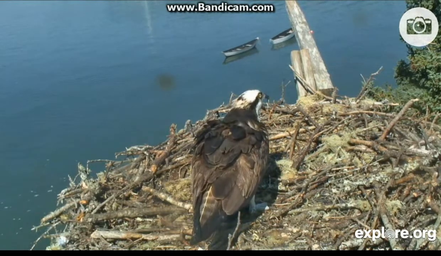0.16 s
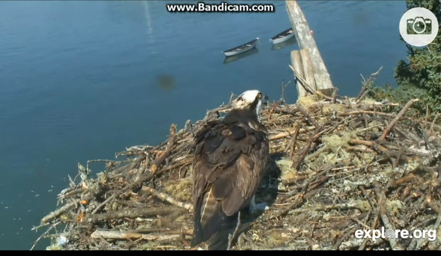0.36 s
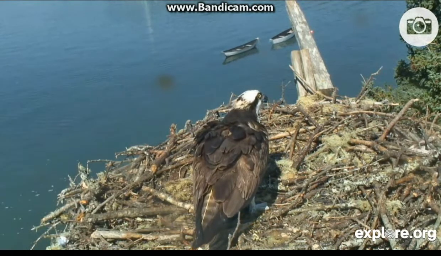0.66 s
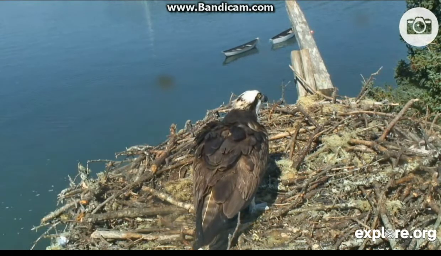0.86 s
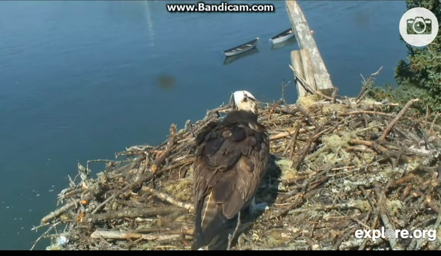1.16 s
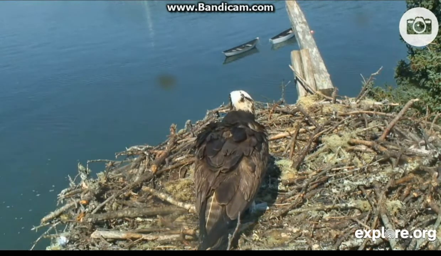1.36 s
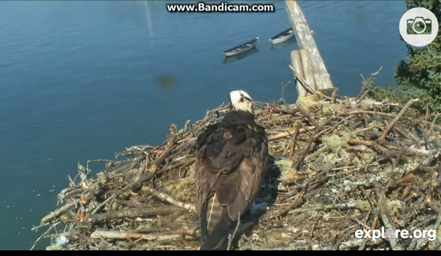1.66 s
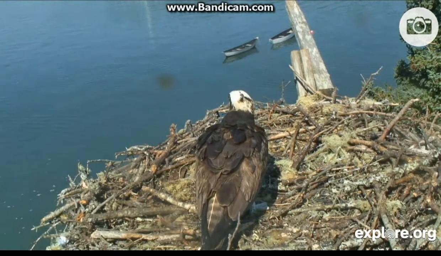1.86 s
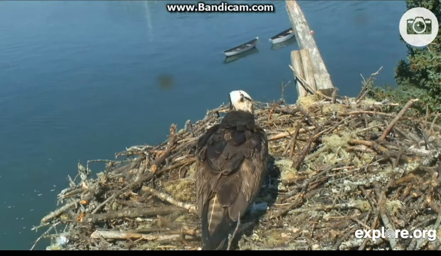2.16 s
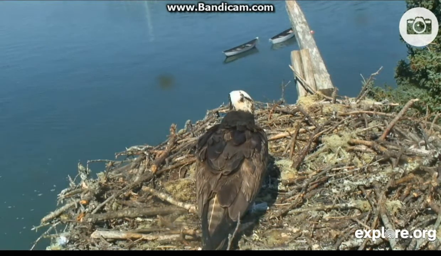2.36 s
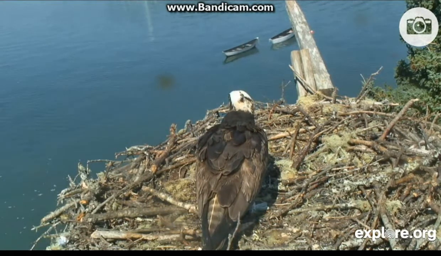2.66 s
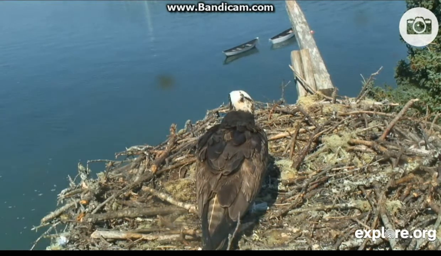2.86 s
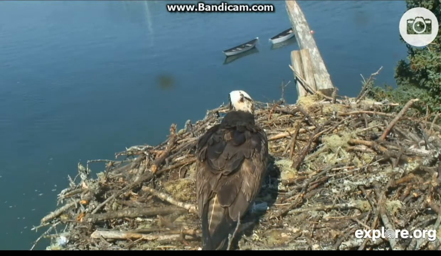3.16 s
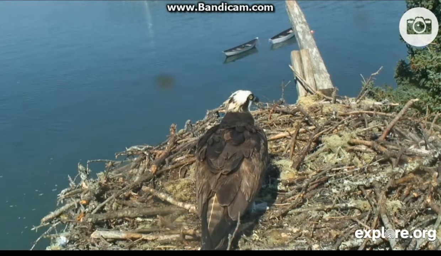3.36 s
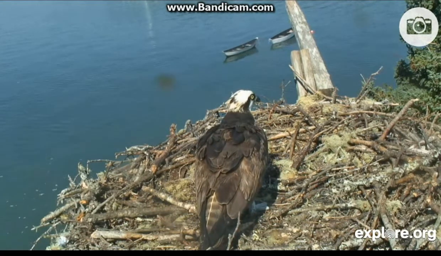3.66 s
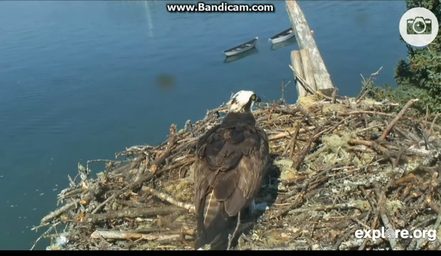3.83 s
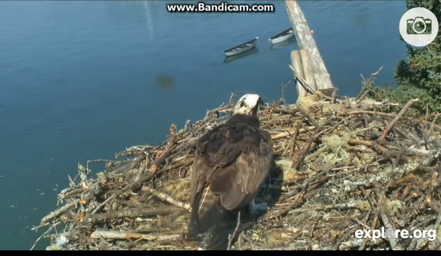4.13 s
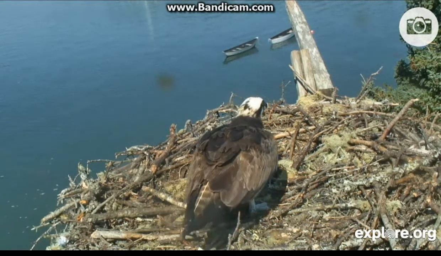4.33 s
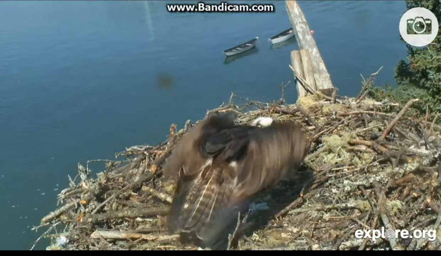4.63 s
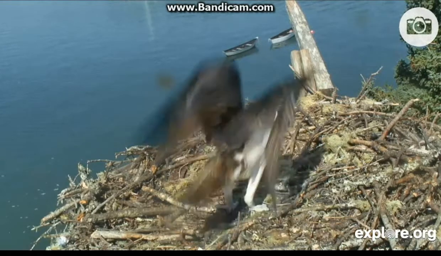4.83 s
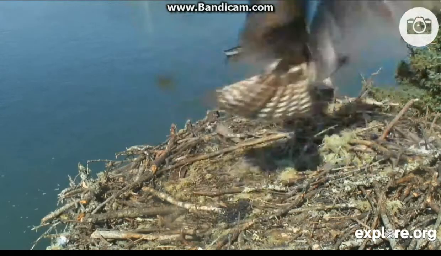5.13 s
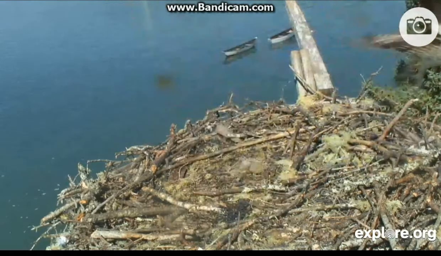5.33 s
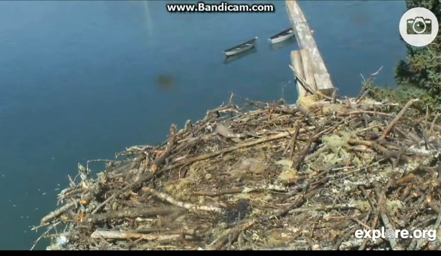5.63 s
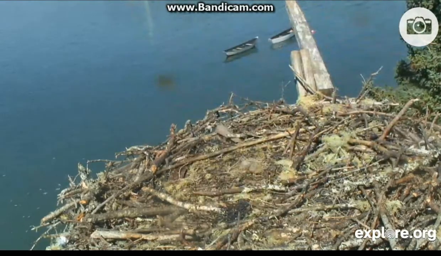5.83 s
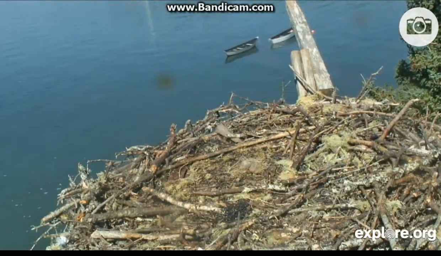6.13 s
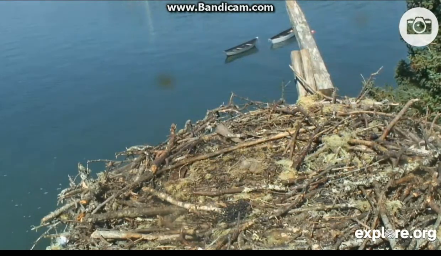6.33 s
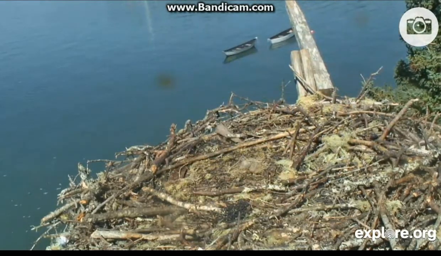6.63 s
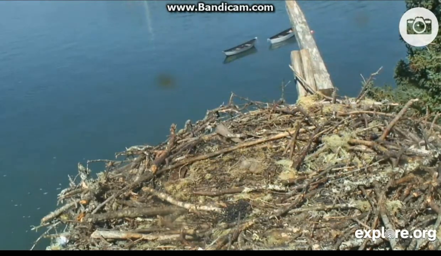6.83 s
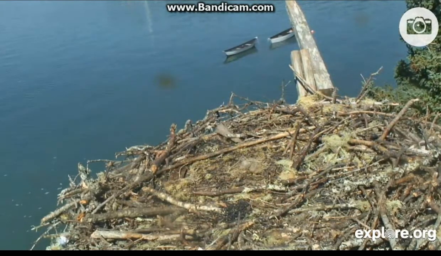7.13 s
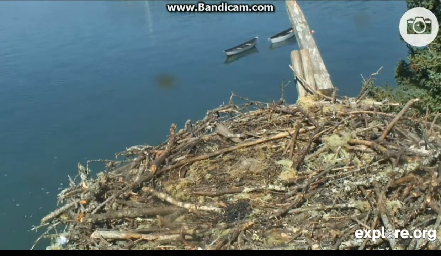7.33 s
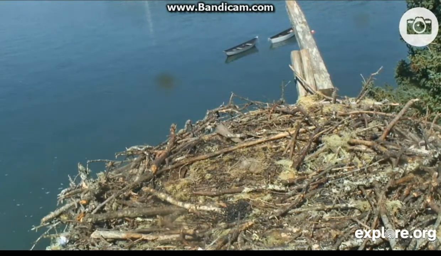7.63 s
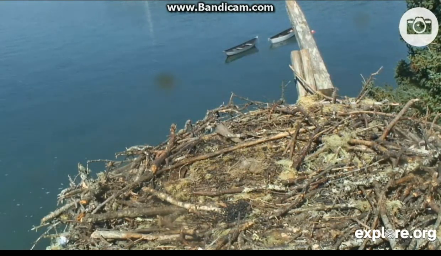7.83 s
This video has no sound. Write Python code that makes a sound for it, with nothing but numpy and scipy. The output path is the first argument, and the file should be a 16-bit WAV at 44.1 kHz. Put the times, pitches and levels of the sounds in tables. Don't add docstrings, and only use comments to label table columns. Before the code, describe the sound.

Brief piping bird chirps, a burst of wingbeats and crackling sticks, one loud snap, then only low hum, faint lapping water and wind.

```python
import sys
import numpy as np
from scipy import signal
from scipy.fft import rfft, irfft, next_fast_len
from scipy.io import wavfile
from scipy.ndimage import uniform_filter1d, map_coordinates

SR = 44100
rng = np.random.default_rng(int(sys.argv[2]) if len(sys.argv) > 2 else 0)


def gain_from_db(level_db):
    decades = np.asarray(level_db, float) / 20
    return 10 ** decades


def wav_out(sig):
    wavfile.write(sys.argv[1], SR, np.round(np.clip(np.atleast_2d(sig).T, -1, 1) * 32767).astype(np.int16))


N = 352359
T = np.arange(N) / SR


def unit(x):
    return x / np.sqrt(np.mean(x ** 2) + 1e-20)


def wobble(rate_hz):
    knots = rng.standard_normal(int(N * rate_hz / SR) + 4)
    return map_coordinates(knots, [T * rate_hz])


def filtered(x, response):
    m = next_fast_len(N + 8192)
    return irfft(rfft(x, m) * response(np.fft.rfftfreq(m, 1 / SR)), m)[:N]


def swells(start_s, peak_db, rise_db_s, fall_db_s, rest_db=-120, hold_s=0):
    coarse = T[::64]
    late = coarse - np.asarray(start_s)[:, None]
    fall = -fall_db_s * np.maximum(late - hold_s, 0)
    db = np.asarray(peak_db)[:, None] + np.minimum(rise_db_s * late, fall)
    power = np.sum(gain_from_db(db) ** 2, axis=0) + gain_from_db(rest_db) ** 2
    return np.interp(T, coarse, 10 * np.log10(power))


def rush(spectrum, patchy_db, lifts=()):
    f, db = np.transpose(spectrum)
    z = signal.stft(rng.standard_normal(N), nperseg=256)[2]
    field = uniform_filter1d(rng.standard_normal(z.shape), size=4, axis=0)
    field = uniform_filter1d(field, size=5, axis=1)
    noise = signal.istft(z * gain_from_db(patchy_db * unit(field)), nperseg=256)[1][:N]

    def response(hz):
        lift_db = sum(gain / (1 + (2 * (hz - centre) / width) ** 2) for centre, width, gain in lifts)
        return gain_from_db(np.interp(np.log(hz + 1), np.log(f), db, right=-120) + lift_db)

    return unit(filtered(noise, response))


def bubbles(start_s, level_db, pitch_hz, cycles, rise):
    k = np.arange(SR // 25)
    turns = pitch_hz[:, None] * k / SR
    life = turns / cycles[:, None]
    envelope = gain_from_db(level_db[:, None] - 25.0 * life) * (1 - np.exp(-turns / 0.88))
    rows = envelope * np.sin(2 * np.pi * turns * (1 + rise * life))
    at = np.round(start_s * SR).astype(int)[:, None] + k
    return np.bincount(at.ravel(), rows.ravel(), N + SR)[:N]


FAN_PITCHES = (107.447, 103.13, 142.8)
HUM_ORDERS = [
    [1, 2, 4, 6, 9, 18, 36],
    [1, 2, 10, 30],
    [1, 2, 4],
    [1, 3, 4, 5, 6, 9],
]
HUM_LEVELS = [
    [-45, -80, -73, -86.5, -90.5, -99, -91.5],
    [-60, -76.5, -78, -86.5],
    [-79.5, -94, -82],
    [-85.5, -81, -81.5, -87, -84.5, -83],
]
# start_s, level_db
FAN_LOAD = [(0.0, -48), (0.22, -48.5), (2.71, -48.5), (3.25, -49.5), (4.27, -48.5), (4.63, -49.5),
            (5.39, -48), (5.83, -49), (6.45, -48), (6.81, -49), (7.65, -48), (7.99, -49)]


def hum():
    mains_hz, in_step_s = 60.01, .025
    out = np.zeros(N)
    drifts = (0.05, .12, 0.076, 0.025)
    for hz, orders, levels, drift in zip(FAN_PITCHES + (mains_hz,), HUM_ORDERS, HUM_LEVELS, drifts):
        angle = 2 * np.pi * hz * (T - in_step_s) + drift * wobble(1.5)
        for k, db in zip(orders, levels):
            level = np.sqrt(2) * gain_from_db(db + 5 * drift * wobble(6))
            out += level * np.cos(k * angle + (k - 1) ** 2)
    load_s, load_db = np.transpose(FAN_LOAD)
    load_db = np.interp(T, load_s, load_db)
    return out * gain_from_db(load_db - load_db.mean())


# pitch_hz, density_db (per Hz)
HISS_SPECTRUM = [(74, -31), (125, -15), (140, -39.5), (210, -19), (388, -32.5), (428, -27), (462, -31),
                 (549, -31.5), (791, -42), (996, -32.5), (1410, -41.5), (2410, -70.5), (3100, -42.5),
                 (4820, -47), (12400, -50.5), (16100, -81.5), (22000, -120)]
# pitch_hz, width_hz, lift_db
HOUSING_MODES = [(540, 117, 9), (1050, 260, 1), (3035, 124, 10), (3710, 330, 9.5)]
# pitch_hz, density_db (per Hz)
BUFFET_SPECTRUM = [(10, -10), (22, -11), (45, -12), (80, -7.5), (140, -8.5), (200, -24), (300, -94)]
# pitch_hz, density_db (per Hz)
THUD_SPECTRUM = [(10, -6), (25, -0.5), (45, -4), (70, -25), (100, -88)]
# start_s, peak_db
WIND_GUSTS = [(1.65, -76), (2.85, -71), (3.14, -69), (5.54, -73), (6.43, -76), (7.05, -75), (7.63, -71),
              (7.82, -67), (7.9, -69), (7.98, -70)]


def air():
    hiss = gain_from_db(-68 + 0.28 * wobble(3.9)) * rush(HISS_SPECTRUM, 0.45, HOUSING_MODES)
    calm_db = -74.5
    wind_db = swells(*np.transpose(WIND_GUSTS), rise_db_s=79, fall_db_s=72, rest_db=calm_db)
    thud = gain_from_db(-90.5 + 3.1 * (wind_db - calm_db)) * rush(THUD_SPECTRUM, 1.5)
    buffet = gain_from_db(wind_db + 3.0 + 1.1 * wobble(9)) * rush(BUFFET_SPECTRUM, 0.39)
    return hiss + thud + buffet


# start_s, peak_db
SHORE_WAVES = [(.92, -79.5), (1.4, -79), (1.75, -76), (2.92, -71.5), (4.5, -74.5), (6.1, -76.5),
               (7.55, -79.5)]
# pitch_hz, density_db (per Hz)
WASH_SPECTRUM = [(150, -50), (400, 3), (700, -6), (1500, -7), (2500, -12), (4000, -16.5), (8000, -56)]
# start_s, peak_db, pitch_hz
LARGE_BUBBLES = [(.562, -62.5, 2030), (.908, -51, 545), (.92, -47.5, 255), (.934, -53, 1220),
                 (.934, -66, 8800), (.934, -63, 2860), (.942, -59, 1920), (0.955, -63, 1680),
                 (1.194, -58, 1330), (1.2, -51.5, 597), (1.212, -59, 1170), (1.335, -62, 1920),
                 (1.393, -50.5, 1050), (1.398, -60, 1840), (1.41, -56, 1250), (1.486, -59, 1100),
                 (1.665, -56, 2120), (1.757, -59, 540), (4.174, -59, 1310), (4.421, -48, 590),
                 (4.51, -58, 1160), (4.545, -58, 1400), (4.577, -55, 487), (4.743, -58, 1090),
                 (4.76, -57.5, 2480), (5.988, -61, 1730), (6.016, -60, 1090), (6.23, -61, 1250),
                 (6.283, -59, 1910), (7.698, -55, 625)]


def water(count=1500):
    surge_db = swells(*np.transpose(SHORE_WAVES), rise_db_s=26, fall_db_s=61, rest_db=-81, hold_s=0.21)
    when, pitch, life, size = rng.random((count, 4)).T
    when = when * T[-1]
    hz = 450 * 6.5 ** pitch
    clumps_db = surge_db + 1.5 * wobble(9.4)
    db = clumps_db[(when * SR).astype(int)] + 5.5 - 1.6 * np.log(size + 0.028) - 3 * np.log2(hz / 1000)
    fizz = bubbles(when, db, hz, 5 + 6 * life, rise=.12)

    s, db, hz = np.transpose(LARGE_BUBBLES)
    cycles = 7.7 * (hz / 1000) ** 0.69
    plops = bubbles(s, db + 3.5, hz, cycles, rise=0.15)
    return fizz + plops + gain_from_db(surge_db + 6.0) * rush(WASH_SPECTRUM, 2.8)


# delay_s, level_db
BANK_ECHOES = [(.027, -23), (.038, -18), (.047, -19), (0.06, -21), (.087, -25), (.113, -24.5), (.13, -31),
               (0.191, -25.5)]


def shore(x):
    t = T[:SR // 2]
    answer = gain_from_db(-52.5 - 60 * t / 0.52) * (t > .012) * rng.standard_normal(len(t))
    for delay, db in BANK_ECHOES:
        answer[round(delay * SR)] += gain_from_db(db)
    echo = signal.fftconvolve(x, answer)[:N]
    flutter = gain_from_db(2.5 * wobble(260))
    return filtered(echo * flutter, lambda hz: 1 / (1 + (hz / 4500) ** 4))


# start_s, peak_db
TWIG_CRACKS = [
    (3.272, -34),
    (3.3094, -55),
]
# pitch_hz, level_db, t60_s
STICK_MODES = [(545, 5.5, 0.023), (705, 10.5, 0.011), (3160, 9.5, 0.0048), (5360, 5.5, 0.0046),
               (7300, -5, 0.0053), (8800, 3.5, 0.0058), (10500, -3.5, .005)]


def twig():
    out, t = np.zeros(N), T[:SR // 20]
    for s, db in TWIG_CRACKS:
        crack = 0.95 * gain_from_db(-60 * t / 0.014) * rng.standard_normal(len(t))
        for hz, level, t60 in STICK_MODES:
            onset = 1 - np.exp(-hz * t / 0.54)
            crack += gain_from_db(level - 60 * t / t60) * onset * np.sin(2 * np.pi * hz * t)
        out[round(s * SR):][:len(t)] += gain_from_db(db - 10) * crack
    return out


# start_s, hiss_db (feathers), push_db (moved air)
WING_STROKES = [(2.76, -76.5, -74), (2.88, -71.5, -70), (2.93, -74.5, -58), (3.02, -73, -72),
                (3.11, -70.5, -51.5), (3.19, -75.5, -60), (3.3, -76.5, -59), (3.395, -73.5, -59.5),
                (3.57, -79, -62), (3.665, -76, -61.5), (3.82, -83, -66), (3.94, -82, -71),
                (4.1, -82.5, -67)]
# pitch_hz, density_db (per Hz)
FEATHER_SPECTRUM = [(800, -54.5), (1500, 1), (3000, -1), (5000, -4), (7500, -5), (10500, -8.5),
                    (12000, -9.5)]
# pitch_hz, width_hz, lift_db
PRIMARY_WHISTLE = [(8600, 1200, 3)]
# pitch_hz, density_db (per Hz)
PUSH_SPECTRUM = [(15, -12), (40, 2), (200, 1.5), (480, -4), (1000, -4.5), (1600, -14), (3000, -49)]
# start_s, peak_db,
# pitch_hz
SHORT_TICKS = [(2.348, -52, 1870), (2.345, -57.5, 790), (2.529, -58, 1910), (2.715, -53.5, 1680),
               (2.765, -63, 2300), (2.83, -53.5, 1650), (2.83, -58, 960), (2.833, -56, 2050),
               (3.008, -51.5, 1980), (3.007, -55, 1100), (3.049, -56, 2200), (3.09, -49, 540),
               (3.099, -48, 417), (3.11, -46.5, 477), (3.115, -50, 870), (3.131, -57, 1110),
               (3.143, -48.5, 520), (3.161, -55, 1500), (3.397, -52, 457), (3.672, -57, 514)]


def wings(count=500):
    s, hiss_db, push_db = np.transpose(WING_STROKES)
    hiss_db = swells(s, hiss_db, rise_db_s=350, fall_db_s=149, hold_s=0.032)
    push_db = swells(s, push_db, rise_db_s=350, fall_db_s=161)
    hiss = gain_from_db(hiss_db + 4.5) * rush(FEATHER_SPECTRUM, 2.9, PRIMARY_WHISTLE)
    push = gain_from_db(push_db - 3.0) * rush(PUSH_SPECTRUM, 3)

    when, pitch, size = rng.random((count, 3)).T
    when = s[0] + (s[-1] - s[0]) * when
    db = hiss_db[(when * SR).astype(int)] + 14 - 3.1 * np.log(size + .01)
    crackle = bubbles(when, db, 700 * 7 ** pitch, np.full(count, 2.5), rise=0)

    s, db, hz = np.transpose(SHORT_TICKS)
    ticks = bubbles(s, db + 6, hz, np.full(len(s), 8), rise=0.031)
    return hiss + push + crackle + ticks


def voice(notes, lean):
    scoop_hz, scoop_s = 200, .003
    out = np.zeros(N, complex)
    for s, length, pitch_hz, sag_hz, db in notes:
        u = np.linspace(0, 1, int(length * SR))
        hz = pitch_hz - scoop_hz * np.exp(-u * length / scoop_s) - sag_hz * u ** 3
        swell = np.abs(np.sin(np.pi * u ** lean)) ** .8
        tone = np.exp(2j * np.pi * np.cumsum(hz) / SR)
        out[round(s * SR):][:len(u)] += np.sqrt(2) * gain_from_db(db) * swell * tone
    return out * gain_from_db(1.2 * wobble(300)) * np.exp(.1j * wobble(900))


# start_s, length_s, pitch_hz, sag_hz, level_db
UPPER_NOTES = [
    (2.3495, .0245, 2860, 90, -45.5),
    (2.4955, .018, 2975, 60, -53.5),
    (2.528, .0205, 2845, 0, -45.5),
    (2.548, .008, 2950, 0, -60),
]
# start_s, length_s, pitch_hz,
# sag_hz, level_db
LOWER_NOTES = [(2.3445, .0055, 2350, 0, -50), (2.349, .027, 2440, 260, -44.5),
               (2.508, .0105, 2960, 300, -49.5), (2.5165, .008, 2520, 170, -57),
               (2.5265, .0065, 2450, 0, -46), (2.5355, .016, 2500, 260, -44.5),
               (2.7145, .0075, 2700, 150, -52.5), (2.7155, .008, 2250, 150, -57),
               (2.903, .0165, 2440, 150, -43), (2.914, .007, 4700, 50, -58), (2.9195, .008, 2300, 100, -58)]
CHIRP_OPENINGS = [
    2.3436,
    2.5248,
    2.9016,
]


def hawk():
    upper = voice(UPPER_NOTES, lean=.75)
    taken = .6 * (np.abs(upper) / np.abs(upper).max()) ** 2
    lower = voice(LOWER_NOTES, lean=1.3) * (1 - taken)
    size = np.abs(upper) + np.abs(lower) + gain_from_db(-54)
    octave = gain_from_db(-12.5 + 2.5 * wobble(250)) * upper ** 2
    octave = octave + gain_from_db(-21) * upper * lower + gain_from_db(-27) * lower ** 2

    flicks = voice([(s, .007, 3560, 40, -55) for s in CHIRP_OPENINGS], lean=.6)
    s, each = np.array(CHIRP_OPENINGS), np.ones(len(CHIRP_OPENINGS))
    clicks = bubbles(s - .0004, -39.5 * each, 2150 * each, 3.5 * each, rise=.03)
    return (upper + lower + flicks + octave / size).real + clicks


def scene():
    call = hawk()
    return (hum() + air() + water() + shore(call) + twig() + wings() + call)[None]


def roll_off(x):
    return signal.sosfilt(signal.butter(12, 12500, fs=SR, output="sos"), x)


def record(dry):
    limited = filtered(dry[0], lambda hz: hz < 12050)
    mix = limited + gain_from_db(-93) * rng.standard_normal(N)
    return roll_off(mix[None])


dry = scene()
out = record(dry)
wav_out(out)
```